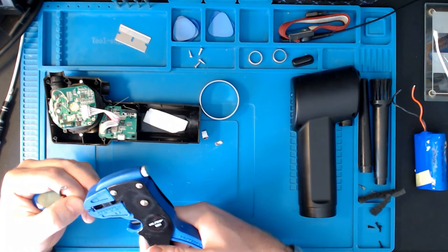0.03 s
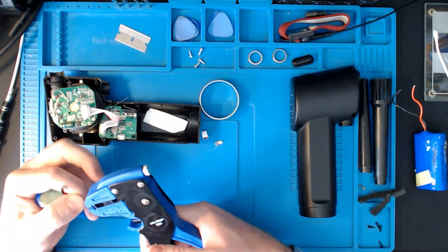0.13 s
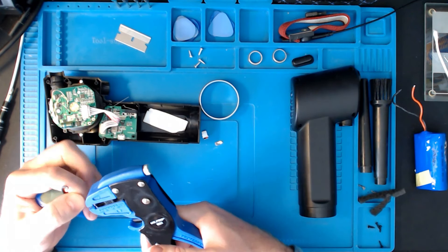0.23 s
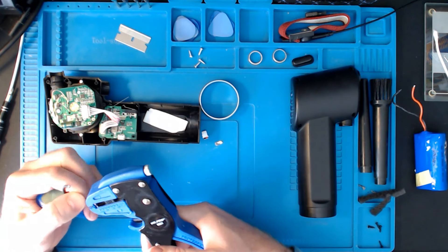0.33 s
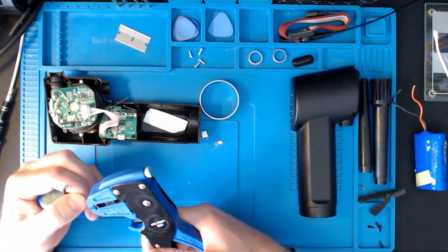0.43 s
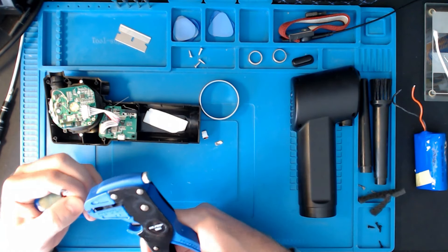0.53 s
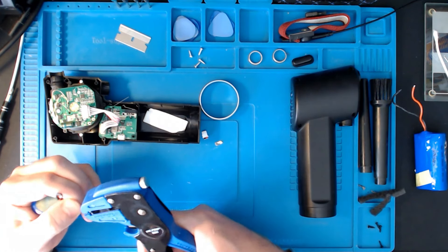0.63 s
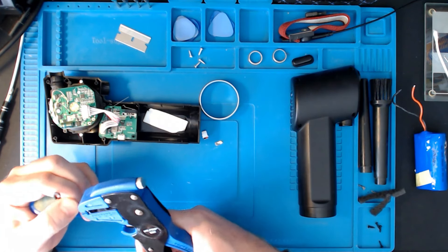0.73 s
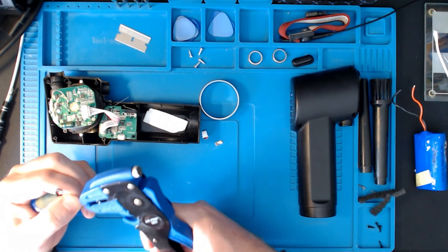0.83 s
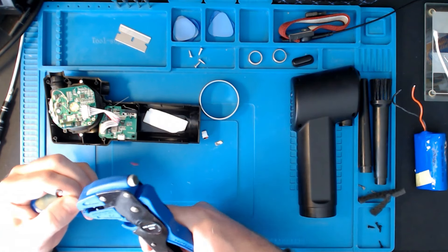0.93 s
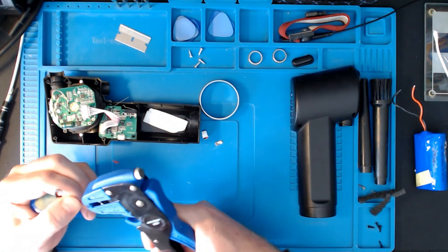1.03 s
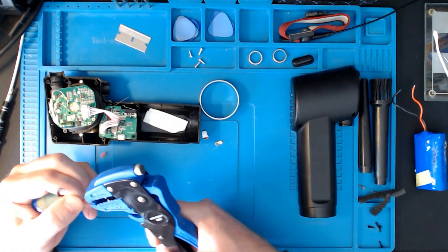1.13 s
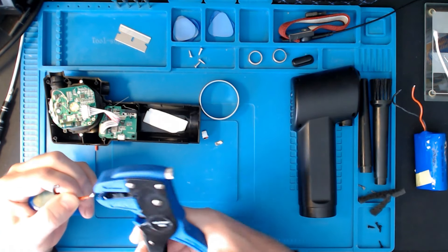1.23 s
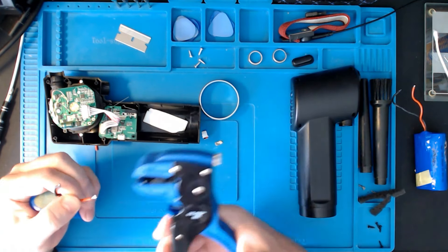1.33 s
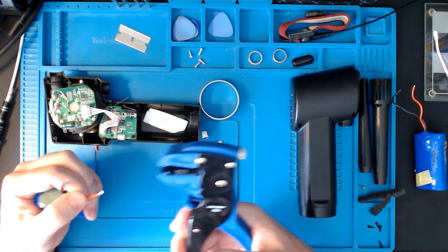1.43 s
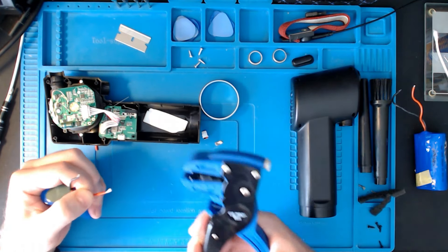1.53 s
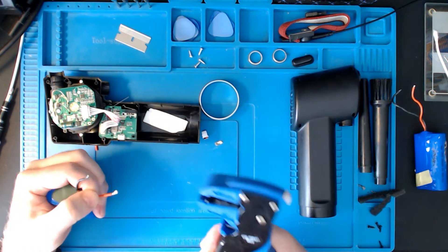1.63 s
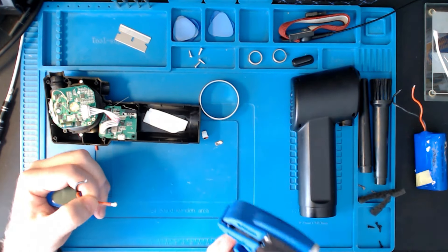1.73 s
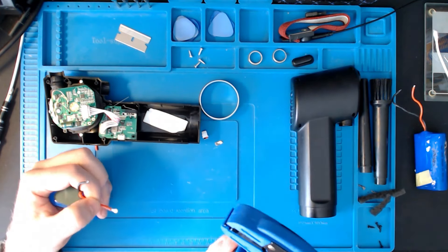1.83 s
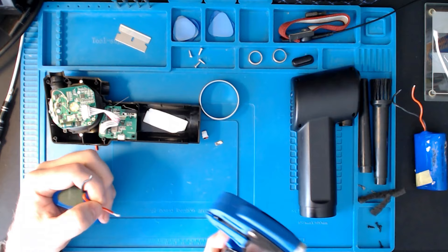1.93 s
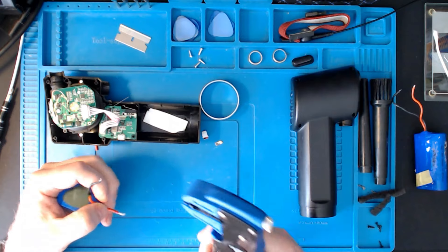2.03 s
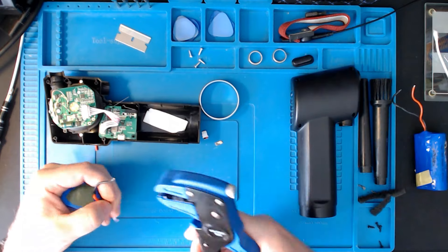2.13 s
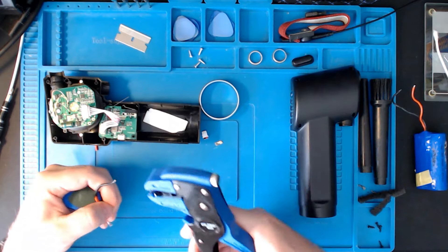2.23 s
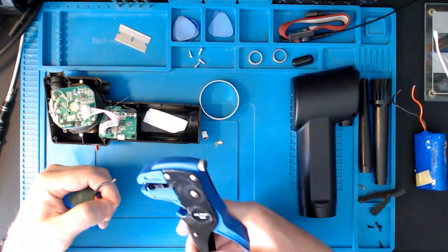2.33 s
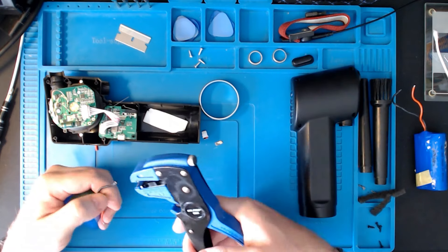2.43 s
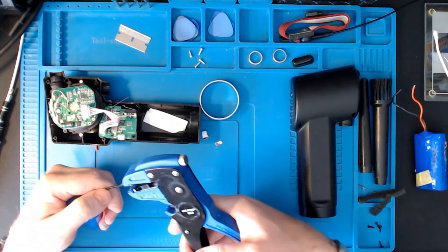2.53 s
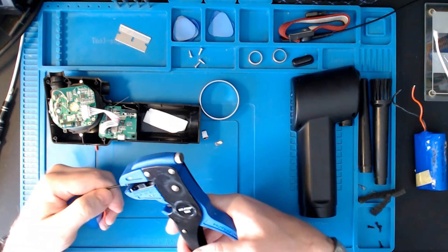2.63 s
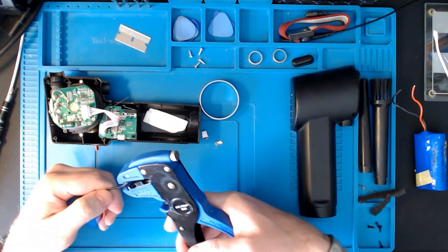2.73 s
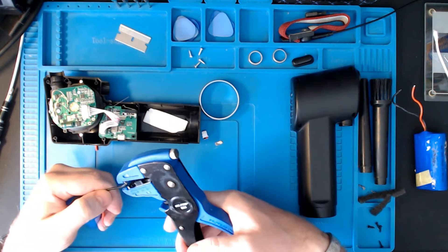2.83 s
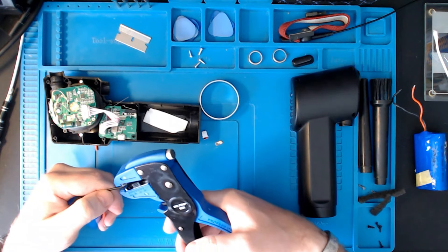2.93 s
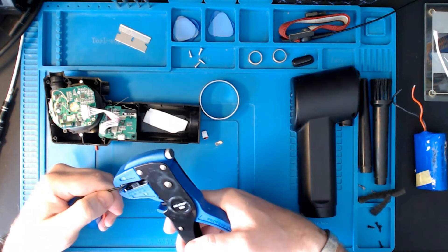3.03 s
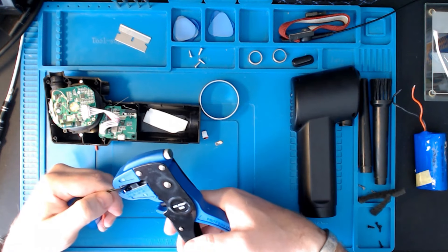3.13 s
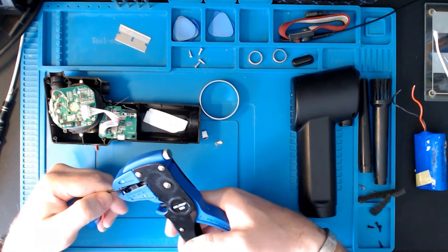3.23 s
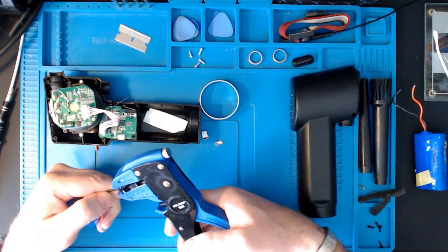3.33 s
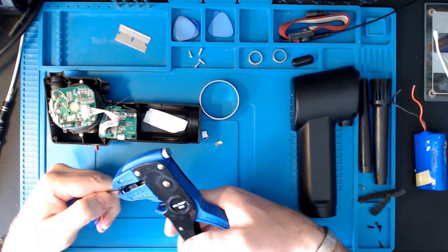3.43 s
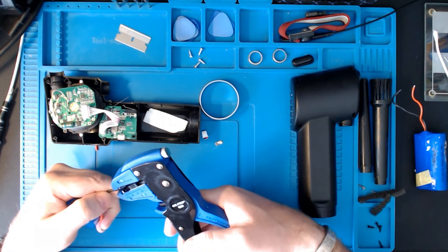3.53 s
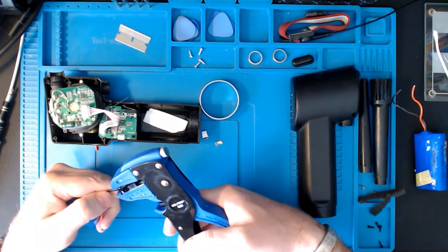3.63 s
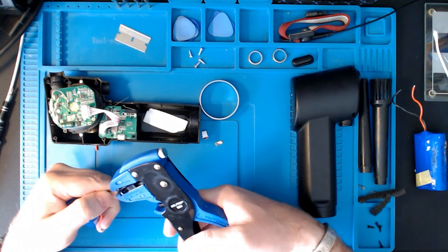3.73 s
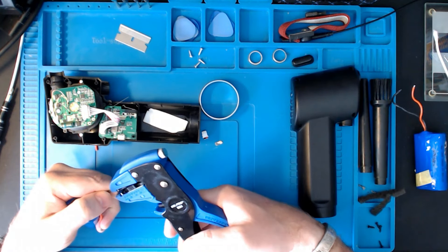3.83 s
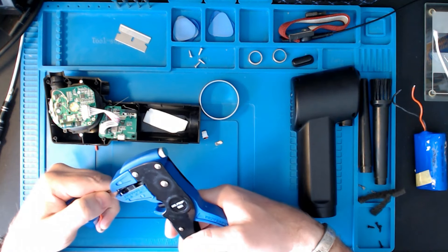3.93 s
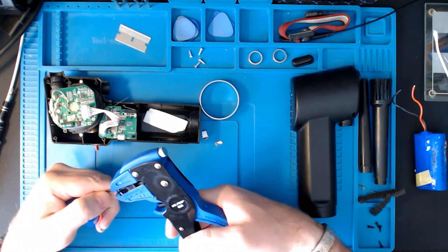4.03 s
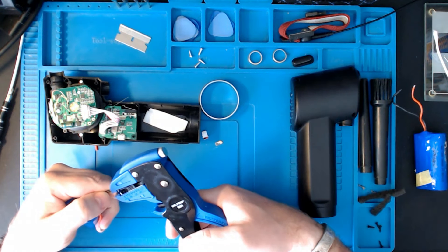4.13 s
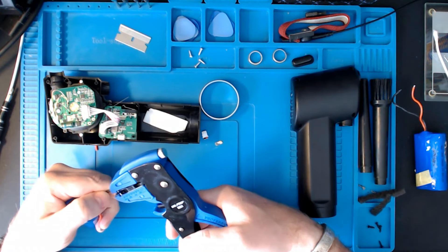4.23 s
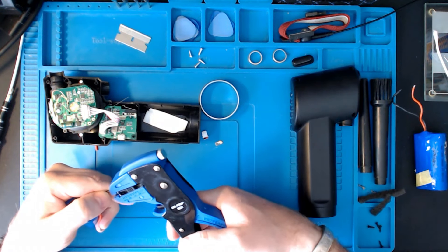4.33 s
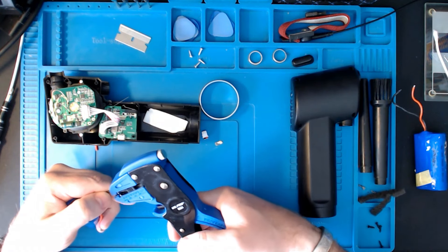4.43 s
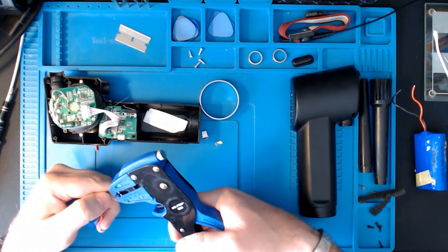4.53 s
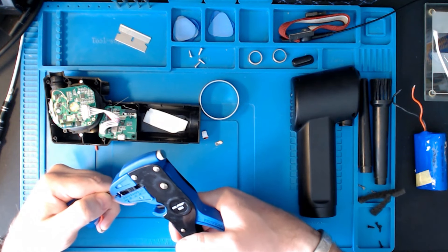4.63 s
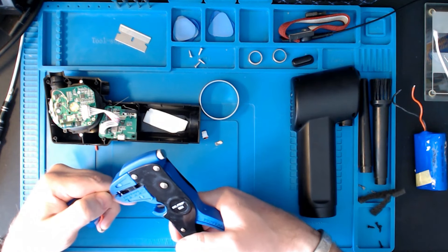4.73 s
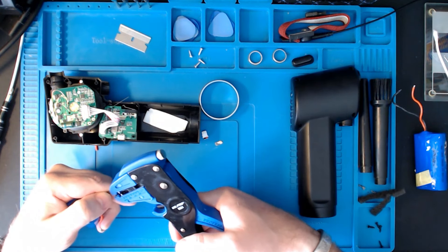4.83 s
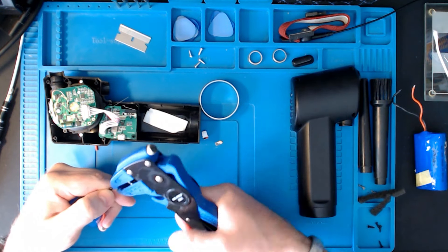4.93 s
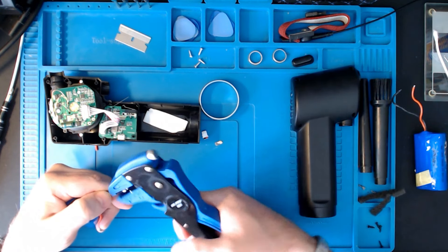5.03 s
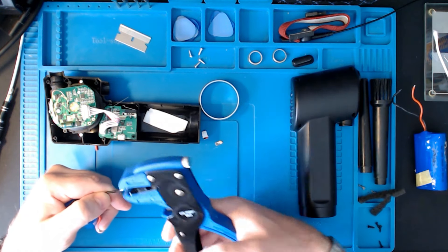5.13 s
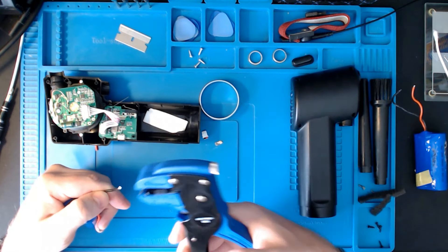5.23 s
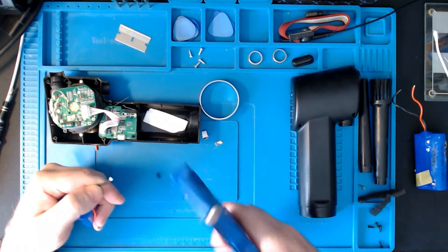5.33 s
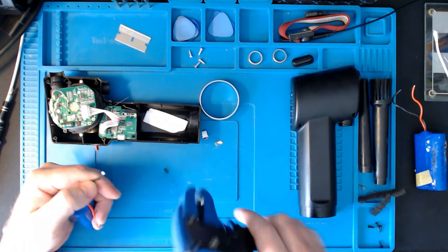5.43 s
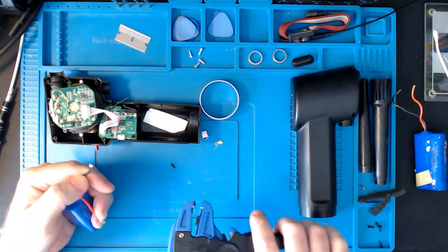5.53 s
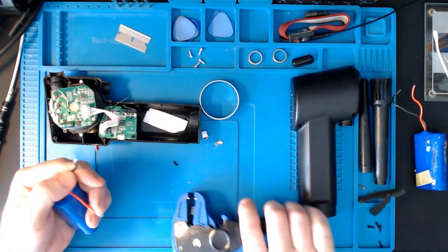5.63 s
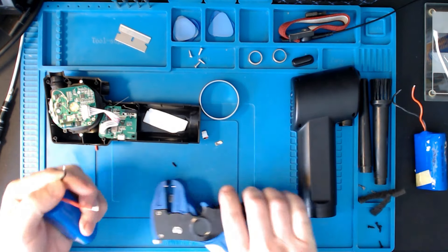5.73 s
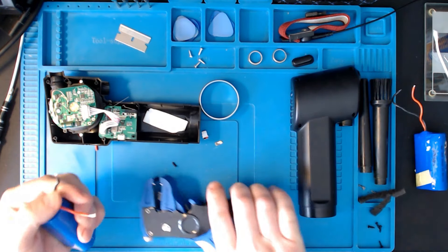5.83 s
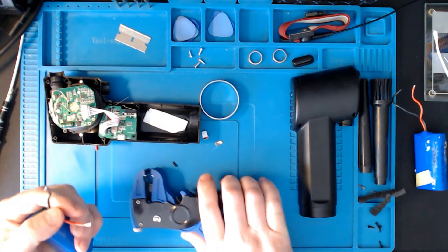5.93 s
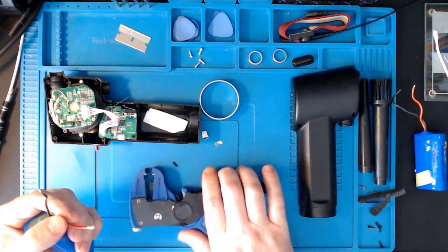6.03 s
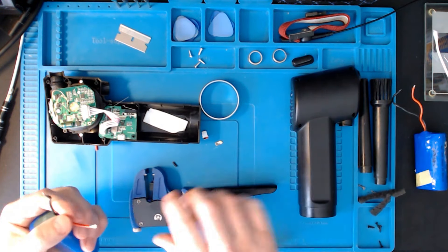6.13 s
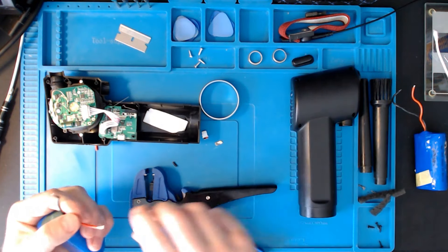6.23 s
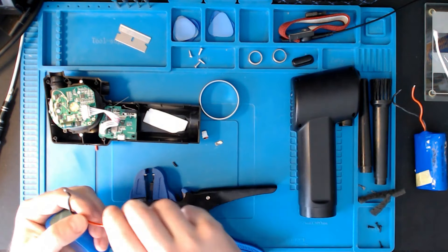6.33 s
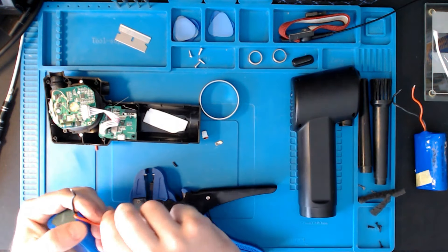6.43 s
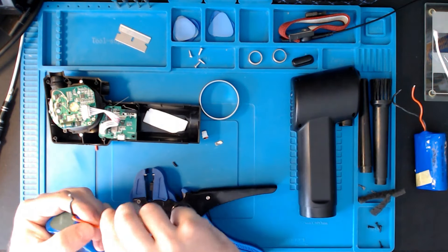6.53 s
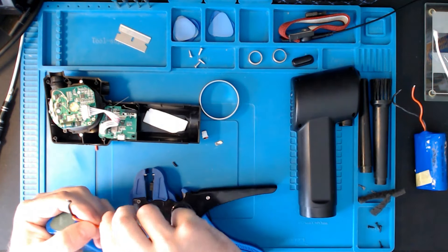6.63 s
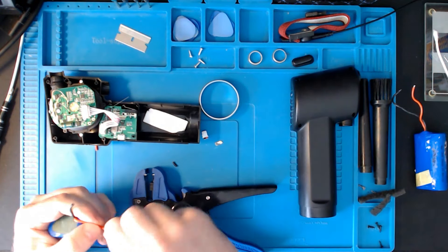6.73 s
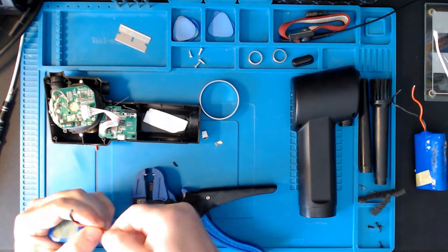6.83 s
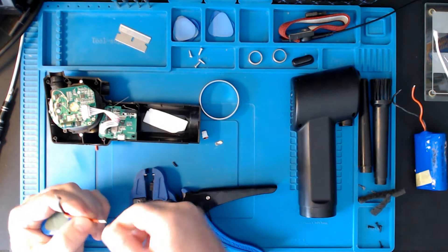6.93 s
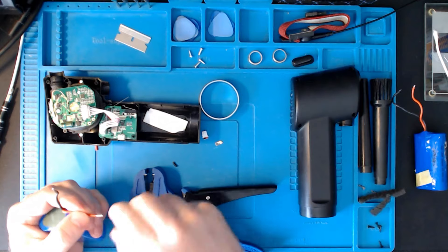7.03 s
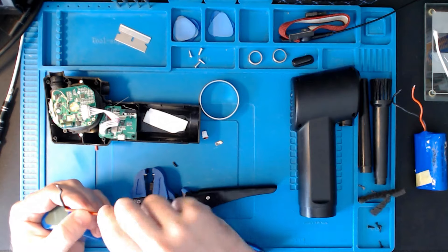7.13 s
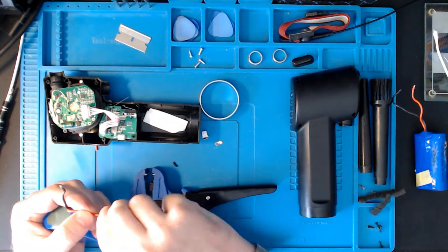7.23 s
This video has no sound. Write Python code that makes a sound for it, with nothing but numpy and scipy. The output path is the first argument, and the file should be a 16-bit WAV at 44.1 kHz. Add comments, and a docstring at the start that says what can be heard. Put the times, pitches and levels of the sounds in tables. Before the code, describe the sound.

Close at a workbench, plastic and steel jaws crack softly into wire insulation, scrape, and spring back with a sharp metallic clack. Tiny handling ticks follow in a long lull. A second, stronger bite and snap comes later, then a dull thud and a heavy knock as the tool is set on a mat. Steady hum and faint air run underneath, with a very short room tail.

```python
"""At a workbench in a small, dry room, an automatic wire stripper is squeezed twice, then laid on a mat.
Its jaws bite, slide and snap back on a spring: noise bursts ring the plastic body, frame and steel jaws.
Rubbing is a dense run of tiny uneven slips. Light ticks of handle, wire and fingers are short noise bands.
Landings on the silicone mat are falling thuds, and the desk booms with decaying sine tones and a rumble.
Mains hum (steady sines) and a fan's soft rush (filtered noise) run underneath."""
import sys
import numpy as np
from scipy import signal
from scipy.fft import rfft, irfft
from scipy.io import wavfile

SR = 44100
rng = np.random.default_rng(int(sys.argv[2]) if len(sys.argv) > 2 else 0)


def dump_mix(stems):
    """Bounce the given channels to the path in sys.argv[1] as a 16-bit WAV at rate SR."""
    frames = np.atleast_2d(stems).T  # one column per channel
    limited = np.clip(frames, -1, 1)  # hard clip at full scale
    pcm = np.round(limited * 32767).astype(np.int16)
    wavfile.write(sys.argv[1], SR, pcm)


N = 321074

PIVOT_HZ, PIVOT_OCTAVES = 2500, 0.32  # the narrow ring of the handle's pivot


def undb(db):
    """Turn decibels into a plain loudness factor."""
    return 10 ** (np.asarray(db) / 20)


def seconds(length):
    """The time of every sample in a stretch of this many seconds."""
    return np.arange(int(length * SR)) / SR


def unit(x):
    """Scale to an energy of one."""
    return x / np.sqrt(np.sum(x ** 2))


def blow(x, db):
    """Give a sound the energy of one millisecond at this level."""
    return unit(x) * undb(db) * np.sqrt(SR / 1000)


def add(track, s, x):
    """Mix a sound into a track at a time in seconds."""
    i = int(s * SR)
    track[i:i + len(x)] += x[:N - i]


def colour(x, spectrum_db):
    """Filter a sound by a curve of dB over pitch, with no sound before its cause (minimum phase)."""
    size = 4096
    hz = np.maximum(np.fft.rfftfreq(size, 1 / SR), 10)
    cepstrum = irfft(np.log(undb(spectrum_db(hz))))
    # folding the second half onto the first moves the response as early as possible
    cepstrum[1:size // 2] *= 2
    cepstrum[size // 2 + 1:] = 0
    response = irfft(np.exp(rfft(cepstrum)))
    return signal.fftconvolve(x, response)[:len(x)]


def through(points, tilt=0):
    """Curve through (Hz, dB) points, with the treble tilted in dB per octave."""
    f, db = np.transpose(points)
    return lambda hz: np.interp(np.log(hz), np.log(f), db) + tilt * np.log2(1 + hz / 1200)


def resonant(modes):
    """Curve of damped resonances: a peak at each pitch, wider when it is more damped."""
    def spectrum_db(hz):
        power = sum(undb(db) ** 2 / (1 + ((hz / f - f / hz) * f / width) ** 2)
                    for f, width, db in modes)
        return 10 * np.log10(power)
    return spectrum_db


def burst(decay_ms):
    """Dense micro-impacts that die away as two parts settle on each other."""
    t = seconds(.15)
    return rng.standard_normal(len(t)) * np.exp(-1000 * t / max(decay_ms, .1))


# steady tones of the mains and of a fan: (f/Hz, level/dB rms)
HUM_TONES = [(99.8, -53), (113.3, -60.5), (120.1, -51), (180.2, -43), (199.8, -67.5), (271, -64),
             (299.7, -65.5), (399.5, -66), (429, -67.5), (699, -72)]
# colour of the fan and room air: (f/Hz, relative level/dB per Hz)
AIR_COLOUR = [(10, -8), (20, 9.5), (32, 3), (140, 3), (360, -1.5), (580, 2.5), (700, 1), (780, -7.5),
              (1000, -10), (1800, -16), (3600, -22), (6500, -25), (8600, -24), (16000, -28.5)]


def background(air_db=-52):
    """Steady hum tones of mains and fan over the soft rush of air."""
    t = np.arange(N) / SR
    hum = sum(np.sqrt(2) * undb(db) * np.sin(2 * np.pi * (hz * t + rng.random()))
              for hz, db in HUM_TONES)
    air = colour(rng.standard_normal(N), through(AIR_COLOUR))
    return hum + undb(air_db) * air / air.std()


# colour of the plastic body: (f/Hz, relative level/dB)
BODY_COLOUR = [(150, -9), (380, -11), (550, -3.5), (750, -9.5), (1100, -8.5), (1700, -9), (2600, 2),
               (4000, -1), (6000, -1.5), (8500, -1.5), (11500, -8.5), (13000, -10.5), (16000, -18.5)]


def slide(length_s, levels_db, tilt, grain_db=2.5):
    """Friction: tiny slips of uneven size, heard through the body, pass evenly through the levels."""
    count = len(seconds(.2))
    slips = rng.standard_normal(count) * undb(grain_db * rng.exponential(size=count))
    rub = colour(slips, through(BODY_COLOUR, tilt))[:len(seconds(length_s))]
    progress = np.linspace(0, 1, len(rub))
    level_db = np.interp(progress, np.linspace(0, 1, len(levels_db)), levels_db)
    return rub / rub.std() * undb(level_db)


# resonances of the tool's frame: (f/Hz, width/Hz, relative level/dB)
FRAME_RINGS = [(2180, 210, -7.5), (2520, 220, 0), (2850, 130, -1), (3550, 220, -2), (4170, 170, -6),
               (4980, 300, -3), (7600, 790, -6.5)]
# resonances of the steel jaws: (f/Hz, width/Hz, relative level/dB)
STEEL_RINGS = [(4820, 300, -4), (5350, 310, -3.5), (6000, 89, -1.5), (7170, 250, -4), (8500, 270, -3.5),
               (9670, 250, -5.5), (10840, 400, -2.5), (11300, 670, -0.5), (15500, 700, -7)]


def clack(db, decay_ms, tilt, steel_db, frame_db=-5):
    """A blow rattles the plastic body and rings the frame and the steel jaws."""
    # frame and steel levels are relative to the body
    parts = [(through(BODY_COLOUR, tilt), 0),
             (resonant(FRAME_RINGS), frame_db),
             (resonant(STEEL_RINGS), steel_db)]
    mix = sum(undb(part_db) * unit(colour(burst(decay_ms), spectrum)) for spectrum, part_db in parts)
    return blow(mix, db)


def tick(db, centre_hz, octaves, decay_ms=3.2, skirt_db=-38):
    """A small contact, damped by the hand: one band of noise above a faint floor at all pitches."""
    def band(hz):
        hump = np.exp(-.5 * (np.log2(hz / centre_hz) / octaves) ** 2)
        return 20 * np.log10(hump + undb(skirt_db))
    return blow(colour(burst(decay_ms), band), db)


# the jaws bite: (t/s of the first crack, its level/dB, gap between cracks/ms, growth per crack/dB)
JAW_BITES = [(0.6448, -21.5, 7.7, -3.5), (4.7557, -10.5, 3.9, 2.5)]
# strongest crack: decay, treble tilt in dB per octave, steel ring relative to the body
CRACK_MS, CRACK_TILT, CRACK_STEEL_DB = 3.2, 0.8, -16.5
# for each dB that a crack is weaker: dB per octave of treble lost, decay gained
CRACK_DULLING, CRACK_DRAG_MS = 1.0, .5
# creak: length, end level relative to the first crack, rise on the way, tilt in dB per octave
CREAK_S, CREAK_DB, CREAK_SWELL_DB, CREAK_TILT = .034, -27, 19.5, -4


def bites(pivot_db=-27.0, pivot_ms=9, count=3):
    """The loaded jaws creak, the insulation cracks (weak cracks duller and longer), the pivot rings."""
    out, k = np.zeros(N), np.arange(count)
    for s, db, gap_ms, growth_db in JAW_BITES:
        creak_end_db = db + CREAK_DB
        add(out, s - CREAK_S, slide(CREAK_S, [creak_end_db - CREAK_SWELL_DB, creak_end_db], CREAK_TILT))
        times = s + k * gap_ms / 1000
        levels = db + k * growth_db
        for at, crack_db, weaker in zip(times, levels, levels.max() - levels):
            decay_ms = CRACK_MS + CRACK_DRAG_MS * weaker
            tilt = CRACK_TILT - CRACK_DULLING * weaker
            add(out, at, clack(crack_db, decay_ms, tilt, CRACK_STEEL_DB))
        # the pivot starts to ring on the second crack
        add(out, times[1], tick(pivot_db, PIVOT_HZ, PIVOT_OCTAVES, pivot_ms))
    return out


# light ticks of handle, wire and fingers: (t/s, level/dB, centre f/Hz, width/octaves)
HANDLING_TICKS = [(0.816, -32.5, 1340, .7), (0.9571, -30.5, 1370, .85), (1.6886, -50.5, 3800, .5),
                  (2.2727, -49, 3000, 0.45), (2.5421, -47.5, 2500, .35), (2.553, -44.5, 2400, .4),
                  (2.7811, -50, 4000, 1), (4.4598, -49, 7000, .5), (5.0143, -32.5, 1140, 0.59),
                  (5.141, -39, 1200, 0.61), (5.1767, -46, 2480, 1), (5.6658, -44, 5520, 0.73),
                  (6.493, -42, 11030, .5)]


def ticks():
    """Small contacts while the tool and the wire are handled."""
    out = np.zeros(N)
    for s, db, centre_hz, octaves in HANDLING_TICKS:
        add(out, s, tick(db, centre_hz, octaves))
    return out


def pull(s=0.889, length_s=0.023, peak_db=-38, edge_db=-46, strain_s=.055, strain_db=-46, count=3):
    """The first squeeze: the pivot ticks faintly under strain, then the cut sleeve scrapes off the wire."""
    out = np.zeros(N)
    for k, chance in enumerate(rng.random(count)):
        at = s - strain_s * (k + chance) / count
        add(out, at, tick(strain_db, PIVOT_HZ, PIVOT_OCTAVES, decay_ms=4))
    add(out, s, slide(length_s, [edge_db, peak_db, edge_db], tilt=-0.3))
    return out


# the spring throws the jaws back:
# (t/s of the snap, level/dB, travel time/s, steel ring/dB, level/dB of the click as they start to move)
JAW_RETURNS = [(1.0559, -3.5, .055, 2.5, -47), (4.9546, -3, .059, 0, -33.5)]
# blows ending each return, catch, first touch and stop: (lead before the snap/ms, relative level/dB,
# decay/ms, brightness/dB per octave, steel ring/dB added to that of the return)
SNAP_BLOWS = [(12.5, -21.5, 3.9, -2.5, -15), (2.5, -10, 1.5, 2.5, -9.5), (0, 0, 2.1, 2, 0.5)]
# levels relative to the snap: coming free, end of the slide; then the slide's rise and tilt in dB per octave
UNLATCH_DB, GLIDE_DB, GLIDE_SWELL_DB, GLIDE_TILT = -27, -33.5, 8.5, -2.7
GLIDE_LEAD_S = .013  # the jaws begin to slide this long before they come free


def returns(unlatch_hz=1330, unlatch_octaves=.7, pivot_db=-20):
    """The jaws come free with a dull click, slide ever louder and snap on their stop, jolting the pivot."""
    out = np.zeros(N)
    for s, db, travel_s, steel_db, start_db in JAW_RETURNS:
        glide_s = travel_s + GLIDE_LEAD_S
        glide_end_db = db + GLIDE_DB
        add(out, s - glide_s, clack(start_db, decay_ms=2.1, tilt=-1.1, steel_db=-10.5))
        add(out, s - glide_s, slide(glide_s, [glide_end_db - GLIDE_SWELL_DB, glide_end_db], GLIDE_TILT))
        add(out, s - travel_s, tick(db + UNLATCH_DB, unlatch_hz, unlatch_octaves))
        add(out, s - travel_s, clack(db + UNLATCH_DB, decay_ms=2.1, tilt=-5, steel_db=-18))
        for lead_ms, blow_db, decay_ms, tilt, ring_db in SNAP_BLOWS:
            at = s - lead_ms / 1000
            add(out, at, clack(db + blow_db, decay_ms, tilt, steel_db + ring_db))
            add(out, at, tick(db + pivot_db, PIVOT_HZ, PIVOT_OCTAVES, decay_ms=1.7))
    return out


def grip(s=4.3011, pivot_db=-34.5):
    """Before the second bite the jaws close lightly on the wire."""
    out = np.zeros(N)
    add(out, s, clack(db=-35.5, decay_ms=1.5, tilt=1.0, steel_db=-17))
    add(out, s, tick(pivot_db, PIVOT_HZ, PIVOT_OCTAVES, decay_ms=1.8))
    return out


def thud(hz, cycles=4.3, fall=0.67):
    """A bending wave crosses the desk top: its higher part travels faster, so the pitch falls."""
    t = seconds(cycles / hz)
    u = t / t[-1]
    swell = np.sin(np.pi * u ** 0.83) ** 2
    # the pitch passes hz halfway through
    return swell * np.sin(2 * np.pi * hz * t * (1 + fall * (1 - u) / 2))


# hands and tool bump onto the mat: (t/s, thud level/dB, thud f/Hz, desk ring level/dB, contact time/ms)
MAT_THUMPS = [(4.759, -19, 112.6, -2, 7.9), (5.48, -4.5, 107, -1.5, 4.66), (5.7394, -15, 102, -4.5, 7.1),
              (5.8366, -22, 102, -24.5, 6.4), (5.871, -2.5, 131.7, 7.5, 1.1), (5.899, -9.5, 83, 1.5, 1.72)]
# ringing tones of the desk: (f/Hz, relative level/dB, time to fall by 60 dB/s, build-up/ms)
DESK_TONES = [(42, -18.5, 0.22, 8), (84, -11, 0.27, 8), (145.7, -21, 0.26, 10), (197.1, -6, .17, 18),
              (281, -13, 0.081, 3.2), (351, -21, 0.097, 3), (442, -24, 0.091, 3), (537.5, -24.5, 0.078, 2)]
SWAY_DB, SWAY_GROWTH = -37, .3  # rumble of the desk, and its rise in dB per dB of ring


def desk(sway_hz=30, sway_decay_s=0.22):
    """Each landing thuds and the desk rings and sways; a longer contact stirs its high tones less."""
    t, out = seconds(1), np.zeros(N)
    modes = np.zeros(len(t))
    for hz, db, t60, rise_ms in DESK_TONES:
        build_up = (1 - np.exp(-1000 * t / rise_ms)) ** 2
        modes += undb(db - 60 * t / t60) * build_up * np.sin(2 * np.pi * hz * t)
    legs = signal.butter(2, [sway_hz * .65, sway_hz * 1.5], "band", fs=SR, output="sos")
    for s, thud_db, hz, ring_db, contact_ms in MAT_THUMPS:
        # one smooth push, zero once the contact is over
        push = np.sin(np.pi * np.minimum(1000 * t / contact_ms, 1)) ** 2
        ring = signal.fftconvolve(push / push.sum(), modes)
        rumble = signal.sosfilt(legs, rng.standard_normal(len(t)))
        sway = rumble / rumble.std() * np.exp(-t / sway_decay_s)
        add(out, s, undb(thud_db) * thud(hz))
        add(out, s, undb(ring_db) * ring)
        add(out, s, undb(SWAY_DB + SWAY_GROWTH * ring_db) * sway)
    return out


TAP_DB, TAP_HZ, TAP_OCTAVES = -19, 720, .85  # tap of a soft landing; level relative to its thud
SOFT_MS = 3  # a contact longer than this is soft


def taps(rattle_s=5.487):
    """Soft landings tap the mat in step with their thuds; loose parts rattle once as the tool lands."""
    out = np.zeros(N)
    for s, thud_db, _, _, contact_ms in MAT_THUMPS:
        if contact_ms > SOFT_MS:
            add(out, s, tick(thud_db + TAP_DB, TAP_HZ, TAP_OCTAVES))
    add(out, rattle_s, clack(db=-33, decay_ms=10, tilt=-5, steel_db=-17))
    add(out, rattle_s, tick(db=-37, centre_hz=3000, octaves=.3, decay_ms=4.8))
    return out


# colour of the tool's head striking the mat: (f/Hz, relative level/dB)
KNOCK_COLOUR = [(150, -16), (330, 6), (550, 3), (850, 2.5), (1100, -6.5), (1400, -2.5), (1800, -24),
                (2500, -18.5), (3200, -12.5), (5000, -24), (9000, -38.5), (16000, -44)]


def knock(s=5.8756, db=-5, tick_db=-23, tick_ms=3.8, settle_db=-18.0, settle_ms=16):
    """The hard head tips onto the mat: one blow and a tick of the plastic body, while loose parts settle."""
    out = np.zeros(N)
    impact = signal.unit_impulse(len(seconds(.1)))
    add(out, s, blow(colour(impact, through(KNOCK_COLOUR)), db))
    add(out, s, blow(colour(burst(tick_ms), through(BODY_COLOUR, -1.3)), tick_db))
    add(out, s, blow(colour(burst(settle_ms), through(KNOCK_COLOUR)), settle_db))
    return out


def stripper():
    """All that the tool radiates in one direction."""
    return bites() + ticks() + pull() + returns() + grip() + taps() + knock()


def room(x, t60=0.18, onset_s=0.005003):
    """A short diffuse tail of fading noise; air and furnishings take the highest treble."""
    t = seconds(.3)
    fade = np.exp(-np.log(1000) * t / t60)
    tail = rng.standard_normal(len(t)) * fade * (1 - np.exp(-t / onset_s))
    # colour of the tail: (f/Hz, relative level/dB)
    tail = colour(tail, through([(200, -2), (1200, 0.5), (2500, -2.0), (4200, 0.0), (7500, -1),
                                 (11500, -1.5), (16000, -2.5)]))
    return signal.oaconvolve(x, unit(tail))[:N]


def scene(wet_db=-15, wall_s=.0152, wall_db=-21):
    """The tool sounds a little different in every direction: one path is direct, three feed the room."""
    out = stripper() + desk() + background()
    paths = [stripper() for _ in range(3)]
    # one near wall throws back a distinct early echo
    add(out, wall_s, undb(wall_db) * paths[0])
    return (out + undb(wet_db) * sum(room(path) for path in paths))[None]


def record(dry, top_hz=15900):
    """The sharpest peaks are clipped flat, then everything above the top pitch is cut."""
    low_pass = signal.ellip(10, .1, 80, top_hz, fs=SR, output="sos")
    return signal.sosfilt(low_pass, np.clip(dry, -.95, .95))


dry = scene()
out = record(dry)
dump_mix(out)
```